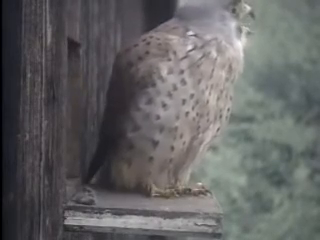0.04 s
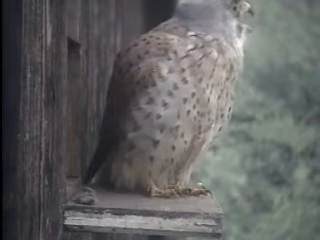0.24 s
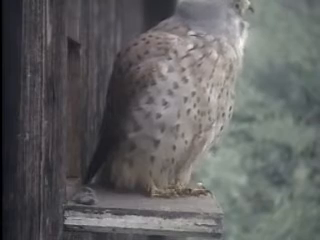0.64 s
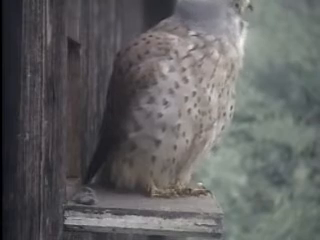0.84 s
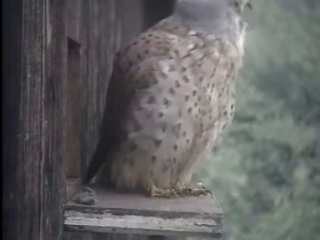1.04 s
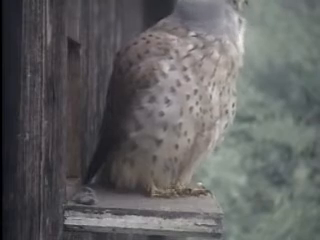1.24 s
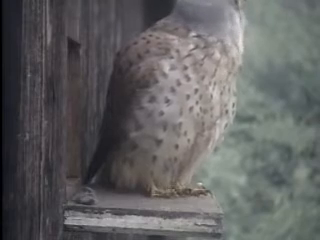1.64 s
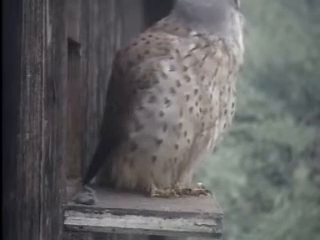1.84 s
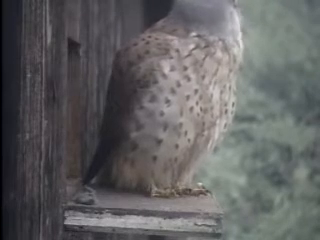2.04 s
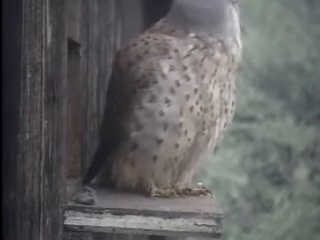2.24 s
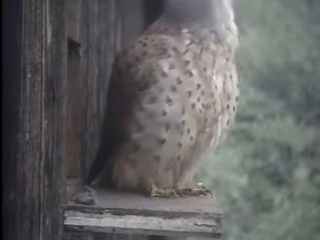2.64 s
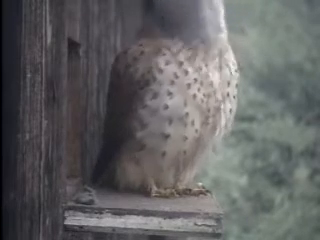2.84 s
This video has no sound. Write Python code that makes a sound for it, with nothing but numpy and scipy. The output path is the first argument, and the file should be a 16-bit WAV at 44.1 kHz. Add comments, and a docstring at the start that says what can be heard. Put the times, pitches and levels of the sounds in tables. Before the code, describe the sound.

A falcon cries harshly eleven times in quick succession over faint outdoor hiss.

```python
"""A quiet yard: a kestrel on a wooden ledge gives one soft low note, then eleven harsh cries.
Most cries start hoarse in the low register of its syrinx, break upward into a clear arch and drop
back with a rasp. Throat, beak and ledge colour the harmonics, and air rushes along with the voice.
The yard answers faintly over a low hum; stepped sampling adds a gritty sheen."""
import sys
import numpy as np
from scipy import signal
from scipy.fft import rfft, irfft
from scipy.io import wavfile
from scipy.ndimage import uniform_filter1d

SR = 44100
rng = np.random.default_rng(int(sys.argv[2]) if len(sys.argv) > 2 else 0)


def materialize(psi):
    """Save the field psi as 16-bit PCM at rate SR to the path in sys.argv[1].

    A 1-D psi becomes a single channel; in a 2-D psi each row is a channel.
    """
    bounded = np.clip(np.atleast_2d(psi).T, -1, 1)
    quanta = np.round(bounded * 32767).astype(np.int16)
    wavfile.write(sys.argv[1], SR, quanta)


N = 132300
BREAK_HZ = 1250  # the voice is hoarse below this pitch, clear above


def amp(db):
    """Decibels to gain."""
    return 10 ** (np.asarray(db) / 20)


def unit(x):
    """Scales to rms 1."""
    return x / np.sqrt(np.mean(x ** 2) + 1e-20)


def read(points, hz):
    """Reads a curve on a log-frequency axis."""
    f, value = np.transpose(points)
    return np.interp(np.log(hz + 1), np.log(f + 1), value)


def add(mix, start_s, sound):
    """Mixes a sound in at its cue."""
    part = mix[max(round(start_s * SR), 0):][:len(sound)]
    part += sound[:len(part)]


def noise(spectrum):
    """Steady noise of a given colour, at rms 1."""
    gain = amp(read(spectrum, np.fft.rfftfreq(N, 1 / SR)))
    return unit(irfft(rfft(rng.standard_normal(N)) * gain, N))


def wander(size, top_hz):
    """A random wobble that rolls off around top_hz."""
    rolloff = np.exp(-(np.fft.rfftfreq(SR, 1 / SR) / top_hz) ** 2)
    return unit(irfft(rfft(rng.standard_normal(SR)) * rolloff, SR))[:size]


def background():
    """A faint bed of hiss and mains hum."""
    # colour of the faint background hiss, with three hollow dips (frequency [Hz], relative level [dB])
    bed_spectrum = [(12, -10), (20, 0), (89, -2.5), (189, -12.5), (261, -14.5), (528, -19), (1250, -18.5),
                    (1510, -29), (1730, -21), (2150, -22), (2980, -29), (3500, -21), (4470, -30.5),
                    (5400, -30), (6530, -55), (8550, -42), (12800, -53), (16700, -92), (22000, -120)]
    hum_hz = 48.5
    hum = unit(np.sin(2 * np.pi * hum_hz * np.arange(N) / SR))
    return amp(-60.5) * noise(bed_spectrum) + amp(-59.5) * hum


def yard(bird):
    """Two near reflections and a faint diffuse tail, its pitch blurred by scattering."""
    # the yard's decay (frequency [Hz], time to fall 60 dB [s])
    decay_times = [(500, 0.4), (3000, 0.32), (6000, 0.31), (12000, 0.14)]
    # first reflections off the walls (delay [s], level [dB])
    walls = [(0.009, -16), (0.03, -25.5)]
    hz, t, bands = signal.stft(rng.standard_normal(SR), SR, nperseg=256)
    decay = amp(-60 * t / read(decay_times, hz)[:, None])
    tail = signal.istft(bands * decay, SR, nperseg=256)[1]
    blur = np.resize(wander(SR, top_hz=220), N)
    echo = signal.fftconvolve(bird * blur, amp(-26.5) * tail / np.linalg.norm(tail))[:N]
    for delay_s, db in walls:
        add(echo, delay_s, amp(db) * bird)
    return echo


def linger(bird):
    """A hiss of scattered sound that dies quickly after each cry."""
    # colour of the airy scatter (frequency [Hz], relative level [dB])
    scatter_spectrum = [(300, -36), (900, -5.5), (1900, -8.5), (2600, 1.5), (3500, -9.5), (4400, -2.5),
                        (5500, -24.5), (12000, -24)]
    release_s = 0.037
    pole = np.exp(-1 / (release_s * SR))
    envelope = np.sqrt(signal.lfilter([1 - pole], [1, -pole], bird ** 2))
    return amp(-29) * envelope * noise(scatter_spectrum)


def wheeze():
    """A thin wheeze between two cries: a narrow band of air noise with a wavering pitch."""
    # path of the wheeze (time [s], pitch [Hz], level [dB])
    contour = [(1.288, 3550, -56), (1.295, 3480, -41.5), (1.312, 3550, -49), (1.328, 3750, -48.5),
               (1.346, 3550, -55), (1.365, 3450, -57), (1.385, 3650, -56.5), (1.4, 3700, -63)]
    width_hz = 420
    times, hz, db = np.transpose(contour)
    t = np.arange(times[0], times[-1], 1 / SR)
    phase = 2 * np.pi * np.cumsum(np.interp(t, times, hz)) / SR
    band = wander(len(t), width_hz) * np.cos(phase) + wander(len(t), width_hz) * np.sin(phase)
    return times[0], unit(band) * amp(np.interp(t, times, db))


def ticks():
    """Tiny, sharp bursts of noise inside two of the cries."""
    # tick cues (time [s], level [dB])
    cues = [(.780, -34), (1.7805, -30)]
    decay_s = 0.00065
    t = np.arange(300) / SR
    out = np.zeros(N)
    for start_s, db in cues:
        add(out, start_s, amp(db) * np.exp(-t / decay_s) * rng.standard_normal(len(t)))
    return out


def breath(calls):
    """Rushing air that rides the loudness of the voice."""
    # colour of the breath (frequency [Hz], relative level [dB])
    air_spectrum = [(200, -18), (700, -26), (2500, -13.5), (4400, -8), (5500, -17), (9000, -23),
                    (13000, -37)]
    envelope = np.sqrt(abs(uniform_filter1d(calls ** 2, size=300)))
    return amp(-32) * envelope * noise(air_spectrum)


def syrinx(hz, effort, jitter, dull_db):
    """Six jittering harmonics, each swelling as it glides through a resonance."""
    # what throat, beak and ledge pass (frequency [Hz], gain [dB])
    resonances = [(600, 22), (780, -9), (950, -4.5), (1100, 1), (1300, -19.5), (1380, -25), (1490, -4.5),
                  (1580, -10.5), (1660, -26), (1900, -14), (2100, -7.5), (2400, 6.5), (2650, -6),
                  (2830, 2.5), (2950, -12.5), (3030, 0.5), (3200, -10.5), (3320, -5.5), (3500, -3.5),
                  (3900, -16), (4100, -15.5), (4380, -7.5), (4600, -23), (5000, -33.5), (5600, -48.5),
                  (8000, -68)]
    soft_db, leap_hz_per_s, shimmer = -31, 30000, 0.013
    cycles = np.cumsum(hz * (1 + jitter * wander(len(hz), top_hz=650))) / SR
    low_register = np.clip((BREAK_HZ - hz) / 80 + 1, 0, 1)
    effort_db = 20 * np.log10(abs(effort) + 1e-6)
    tilt_db = dull_db + low_register * 0.27 * np.maximum(soft_db - effort_db, 0)  # soft and low is dull
    rise_hz_per_s = uniform_filter1d(np.gradient(hz) * SR, size=130).clip(0)
    leap = np.minimum(rise_hz_per_s / leap_hz_per_s, 1) ** 2
    harmonics = 0
    for k in range(1, 7):
        leap_loss_db = leap * (5 + 12 * abs(k - 2))  # in an upward leap all but the second collapse
        low_loss_db = 4 * low_register * max(k - 3, 0)
        gain = amp(read(resonances, k * hz) - tilt_db * (k - 1) - leap_loss_db - low_loss_db)
        harmonics += gain * np.cos(2 * np.pi * (k * cycles + rng.random()))
    return effort * harmonics * (1 + shimmer * wander(len(hz), top_hz=370))


def drop(hz, effort_db):
    """The voice falls back to the low register and dies in a short rasp."""
    # colour of the rasp (frequency [Hz], relative level [dB])
    rasp_spectrum = [(500, -22), (1900, -27), (2450, 4.5), (2800, -21), (3300, -22), (4200, -7.5),
                     (5500, -28)]
    length_s, attack_s, fade_from_s = 0.02, 0.0056, 0.0051
    fade_db_per_s, sag_hz_per_s = 1600, 5270
    t = np.arange(0, length_s, 1 / SR)
    fade_db = fade_db_per_s * np.maximum(t - fade_from_s, 0)
    effort = np.minimum(t / attack_s, 1) * amp(effort_db - fade_db)
    swell = np.sin(np.pi * (t / length_s) ** 0.51) ** 2
    rasp = amp(-46.5) * swell * noise(rasp_spectrum)[:len(t)]
    return syrinx(hz - sag_hz_per_s * t, effort, jitter=0.012, dull_db=0) + rasp


def growl(t):
    """A second vibration shakes the third cry; returns its envelope and its fluttering gain."""
    centre_s, half_width_s, rate_hz, depth = 0.733, 0.015, 240, 0.24
    envelope = np.exp(-((t - centre_s) / half_width_s) ** 2)
    hz = rate_hz * (1 + 0.1 * wander(len(t), top_hz=162))
    return envelope, 1 + depth * envelope * np.cos(2 * np.pi * np.cumsum(hz) / SR)


def cry(contour):
    """One call of the syrinx: it scoops in from below, then follows its pitch and effort."""
    scoop_s, scoop_hz, scoop_db, fade_s = 0.012, 93.7, 21.5, 0.00233
    times, pitches, efforts_db = np.transpose(contour)
    t = np.arange(times[0] - scoop_s, times[-1] + fade_s, 1 / SR)
    t = t[t >= 0]
    scoop = np.maximum(times[0] - t, 0) / scoop_s
    hz = np.interp(t, times, pitches) - scoop_hz * scoop
    fades = np.clip(np.minimum(t - t[0], t[-1] - t) / fade_s, 0, 1)
    effort = amp(np.interp(t, times, efforts_db) - scoop_db * scoop) * fades
    growling, flutter = growl(t)
    between_registers = np.exp(-((hz - 1230) / 90) ** 2)  # the voice is unsteady here
    jitter = np.where(hz < BREAK_HZ, 0.0068, 0.005) + 0.018 * (growling + between_registers)
    return t[0], syrinx(hz, effort * flutter, jitter, dull_db=1.5 * growling)


def kestrel():
    """The dry bird: cries and their closing drops, with breath, wheeze and ticks."""
    # one contour for the soft note, then one per cry (time [s], pitch [Hz], effort [dB])
    contours = [
        [(0.0, 843, -43), (0.006, 788, -37.5), (0.015, 787, -50.5), (0.031, 798, -39), (0.044, 744, -43.5),
         (0.056, 775, -64)],
        [(0.196, 902, -37), (0.207, 912, -30.5), (0.222, 1082, -37), (0.231, 1093, -42.5), (0.236, 1372, -30),
         (0.242, 1362, -24), (0.248, 1399, -32), (0.259, 1347, -25), (0.265, 1416, -28), (0.278, 1459, -27),
         (0.28, 1478, -27), (0.287, 1475, -26), (0.297, 1351, -26.5)],
        [(0.465, 966.5, -33), (0.478, 950.5, -30.5), (0.494, 1044, -31.5), (0.501, 1068, -35.5),
         (0.507, 1416, -26), (0.514, 1441, -25), (0.517, 1486, -29), (0.519, 1489, -27.5), (0.524, 1537, -26),
         (0.543, 1565, -26), (0.559, 1384, -24), (0.569, 1462, -23), (0.576, 1407, -26.5)],
        [(0.699, 914, -36), (0.703, 879, -35), (0.736, 928.5, -23.5), (0.753, 1024, -30), (0.759, 1403, -33),
         (0.765, 1429, -24), (0.77, 1481, -30.5), (0.781, 1450, -25), (0.788, 1395, -26), (0.796, 1430, -25),
         (0.801, 1485, -27.5), (0.809, 1432, -24.5), (0.813, 1380, -27.5)],
        [(0.922, 955, -36), (0.927, 953, -35.5), (0.942, 941.7, -28.5), (0.969, 1036, -33), (0.975, 1402, -30),
         (0.983, 1415, -26), (0.99, 1445, -27.5), (0.993, 1400, -35), (1.0, 1476, -27.5), (1.013, 1526, -23.5),
         (1.021, 1504, -26.5), (1.025, 1403, -28), (1.028, 1406, -26.5)],
        [(1.139, 940, -38), (1.146, 906, -30.5), (1.156, 981, -33.5), (1.161, 1008, -55.5), (1.166, 1358, -27),
         (1.173, 1343, -30), (1.188, 1354, -23), (1.195, 1327, -27), (1.203, 1442, -30), (1.214, 1491, -29.5),
         (1.253, 1549, -25.5), (1.264, 1456, -27.5), (1.268, 1429, -22), (1.275, 1512, -25.5),
         (1.284, 1419, -25.7), (1.29, 1393, -25.5)],
        [(1.393, 963, -40.5), (1.403, 972.6, -30.5), (1.419, 994, -34), (1.425, 1400, -33), (1.43, 1375, -28),
         (1.454, 1514, -32.5), (1.469, 1539, -26.5), (1.484, 1401, -28.6), (1.488, 1428, -22.5),
         (1.496, 1509, -30), (1.505, 1430, -25), (1.51, 1403, -27)],
        [(1.62, 1205, -52), (1.637, 1324, -40), (1.651, 1091, -47.5), (1.665, 1147, -40.5),
         (1.672, 1381, -37.5), (1.681, 1420, -31), (1.698, 1471, -31), (1.711, 1445, -28), (1.743, 1648, -23),
         (1.763, 1643, -19.5), (1.766, 1650, -25), (1.77, 1524, -25), (1.778, 1493, -26.5), (1.787, 1512, -22),
         (1.793, 1513, -26), (1.802, 1383, -23.5)],
        [(1.918, 1136, -48.5), (1.924, 1170, -44.5), (1.934, 1307, -38.9), (1.945, 1344, -30.5),
         (1.951, 1410, -31.5), (1.965, 1427, -26.5), (1.969, 1437, -34), (1.975, 1518, -26.5),
         (1.982, 1565, -29), (2.013, 1554, -26), (2.062, 1677, -22.5), (2.069, 1524, -26.5),
         (2.073, 1540, -29.5), (2.09, 1364, -20.5), (2.095, 1380, -43)],
        [(2.218, 1421, -38), (2.24, 1427, -32.5), (2.251, 1453, -42.5), (2.258, 1531, -31),
         (2.271, 1504, -30.3), (2.279, 1556, -27.5), (2.308, 1557, -29.5), (2.317, 1508, -30.5),
         (2.332, 1515, -27), (2.338, 1530, -29.5), (2.346, 1302, -26)],
        [(2.475, 1401, -36), (2.49, 1455, -36.5), (2.491, 1470, -31), (2.5, 1516, -30.5), (2.526, 1517, -26),
         (2.534, 1496, -28), (2.536, 1493, -30.5), (2.544, 1368, -26.5)],
        [(2.666, 1380, -33), (2.684, 1545, -30), (2.702, 1483, -28), (2.711, 1536, -25), (2.716, 1576, -25.5),
         (2.726, 1419, -30), (2.728, 1400, -30), (2.731, 1354, -29)],
    ]
    # the fall that ends each cry (time [s], pitch [Hz], effort [dB])
    falls = [(.298, 962, -26.5), (0.575, 979, -27.5), (0.811, 975, -33.5), (1.027, 970, -35.5),
             (1.290, 979, -35), (1.509, 971, -34), (1.8, 975, -33.5), (2.093, 981, -32),
             (2.348, 967, -40.5), (2.546, 960, -47), (2.732, 970, -46)]
    calls = np.zeros(N)
    for contour in contours:
        add(calls, *cry(contour))
    for start_s, hz, effort_db in falls:
        add(calls, start_s, drop(hz, effort_db))
    bird = calls + breath(calls)
    add(bird, *wheeze())
    return bird + ticks()


def scene():
    """The bird and its echoes over the background, in mono."""
    bird = kestrel()
    return (bird + yard(bird) + linger(bird) + background())[None]


def record(dry):
    """Unsmoothed sample-and-hold mirrors the cries into the treble; a low-pass trims the top."""
    hold_rate_hz, cutoff_hz = 32000, 12800
    coarse = signal.resample(dry, N * hold_rate_hz // SR, axis=1)
    held = coarse[:, np.arange(N) * hold_rate_hz // SR]
    lowpass = signal.firwin(511, cutoff_hz, window=("kaiser", 9), fs=SR)
    return signal.oaconvolve(held, lowpass[None], "same")


dry = scene()
out = record(dry)
materialize(out)
```